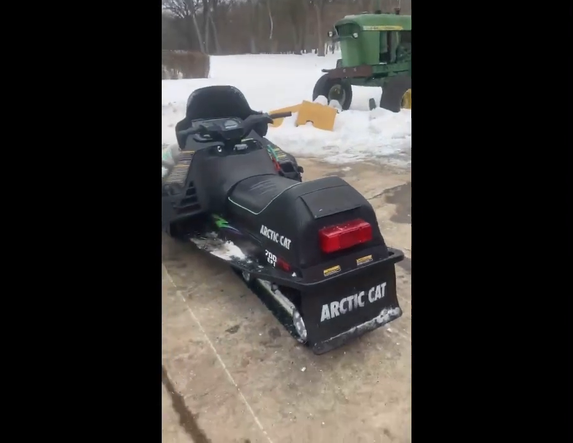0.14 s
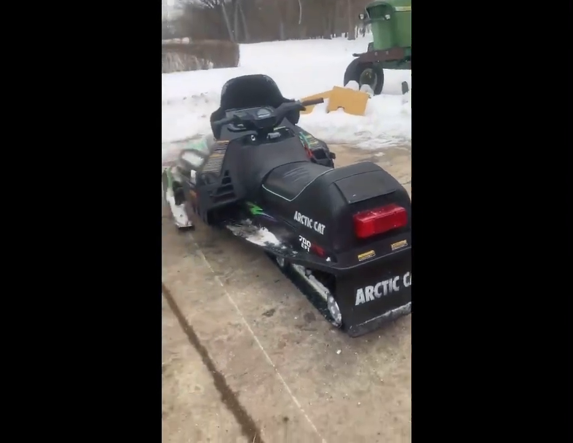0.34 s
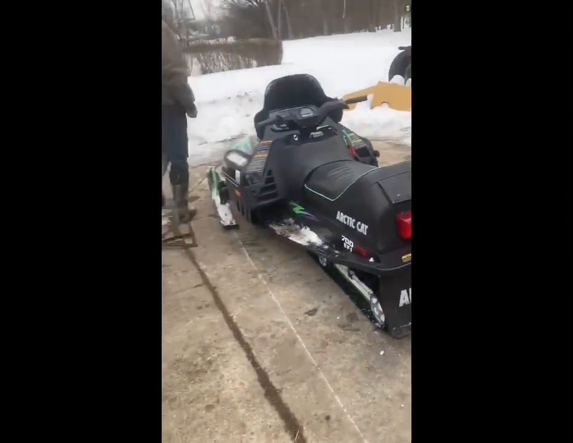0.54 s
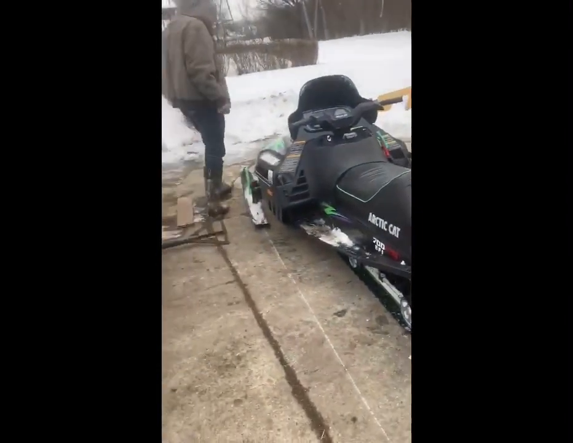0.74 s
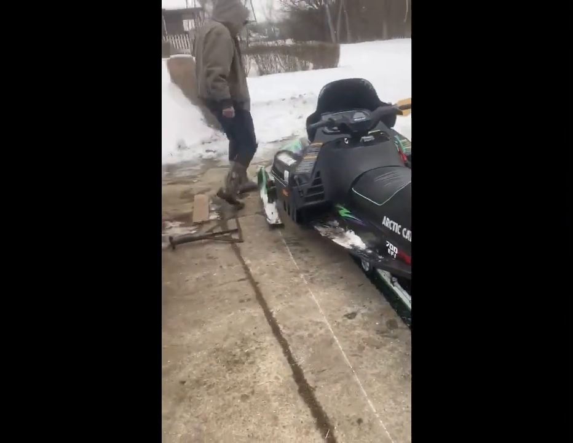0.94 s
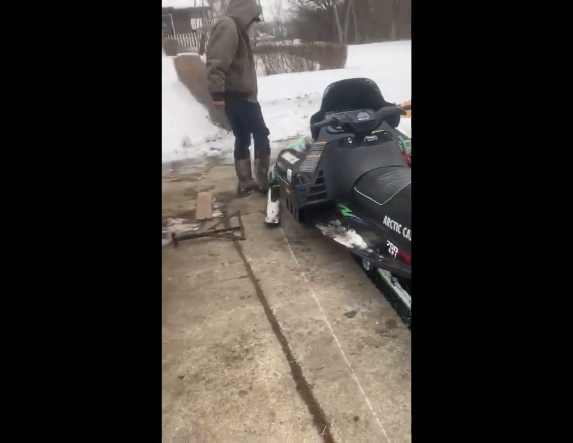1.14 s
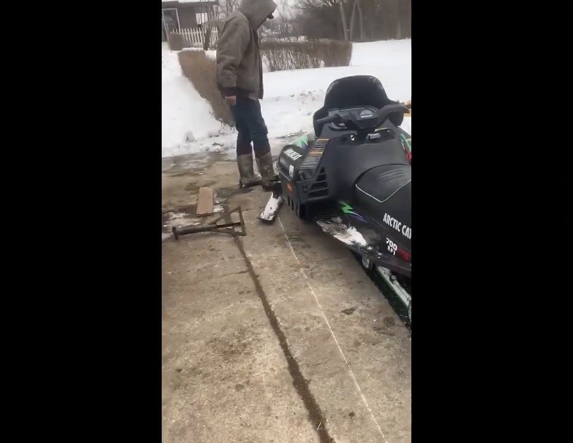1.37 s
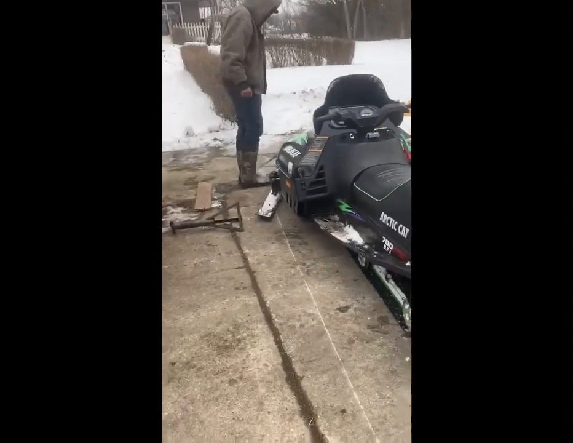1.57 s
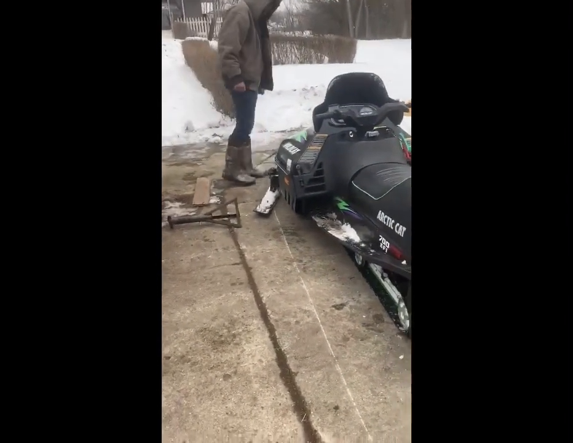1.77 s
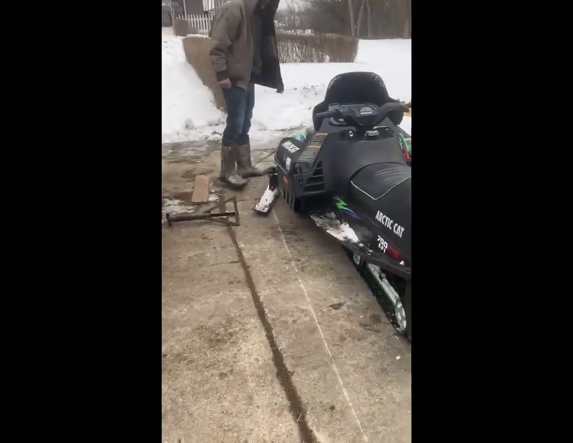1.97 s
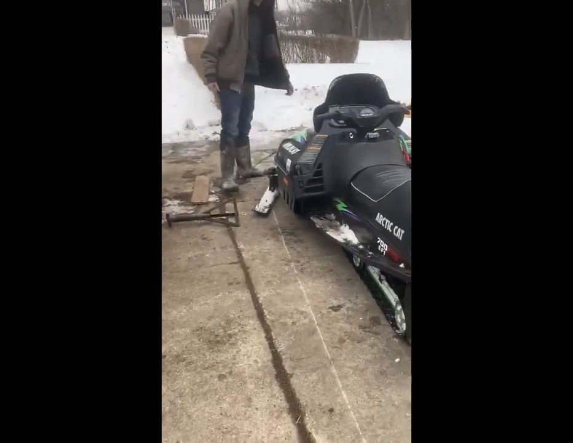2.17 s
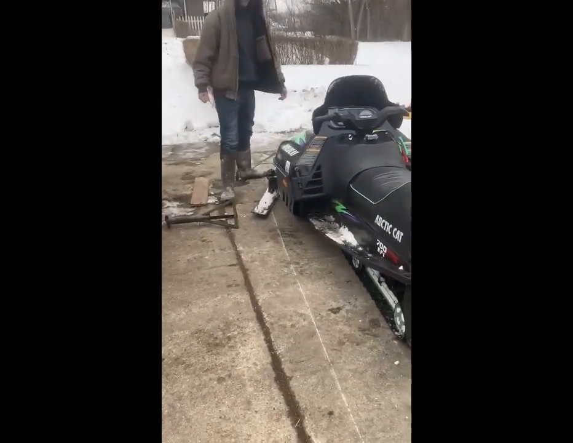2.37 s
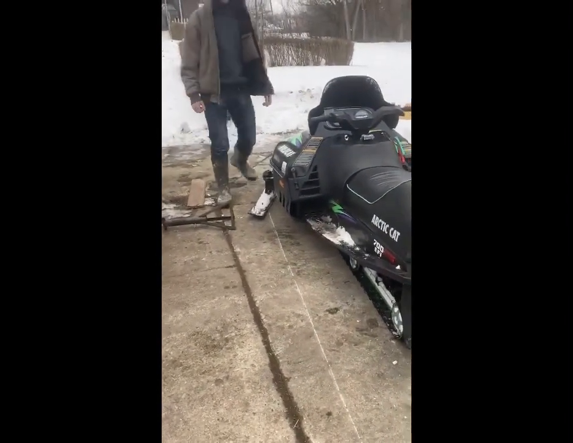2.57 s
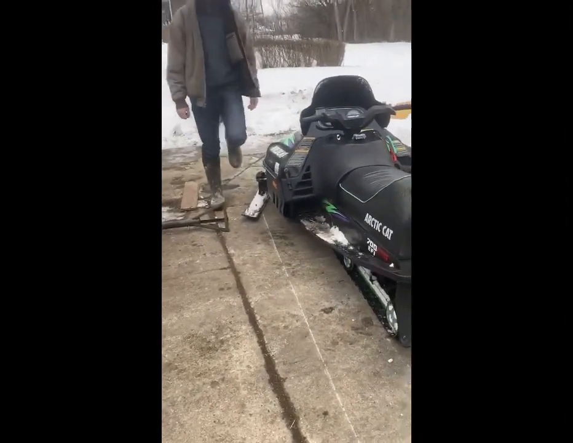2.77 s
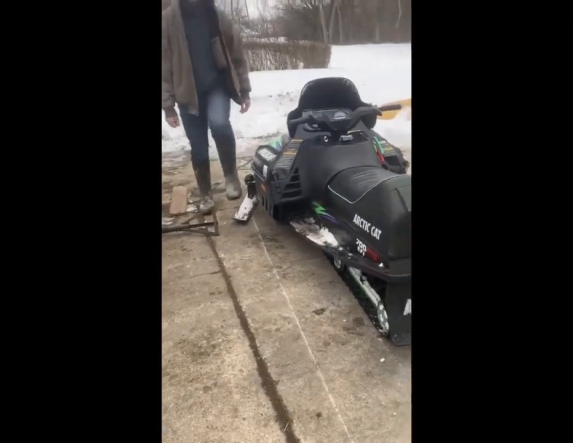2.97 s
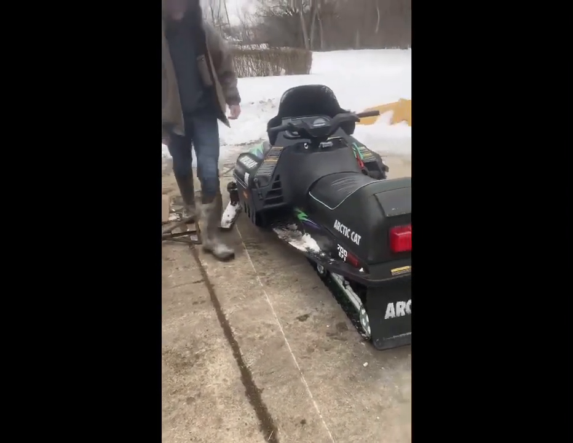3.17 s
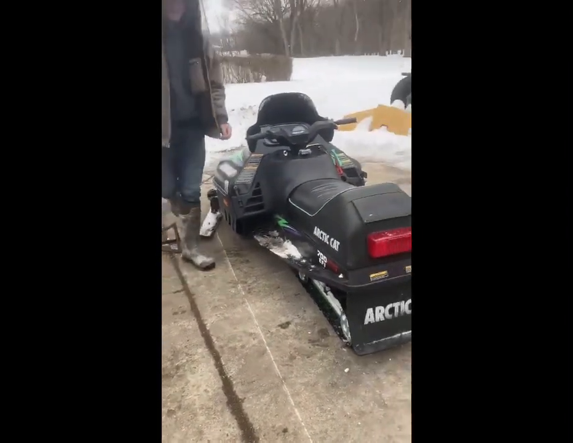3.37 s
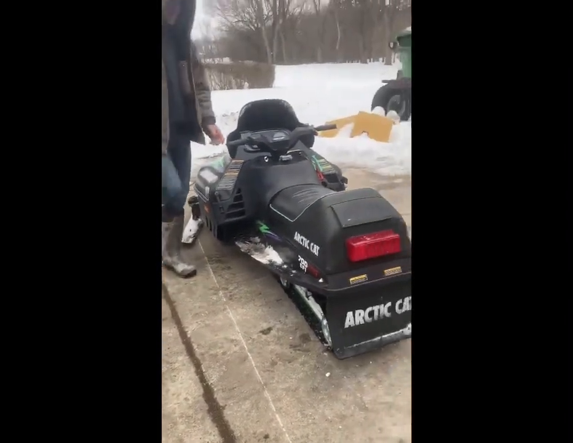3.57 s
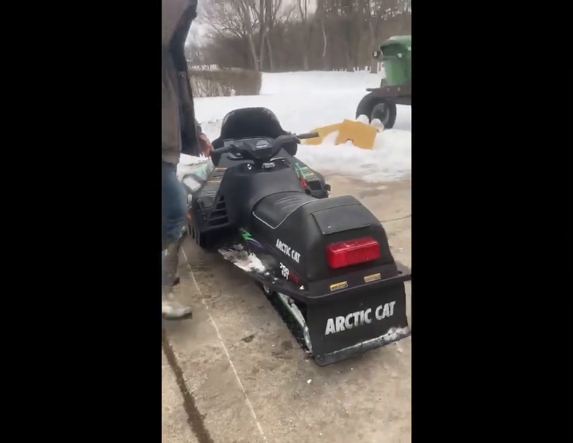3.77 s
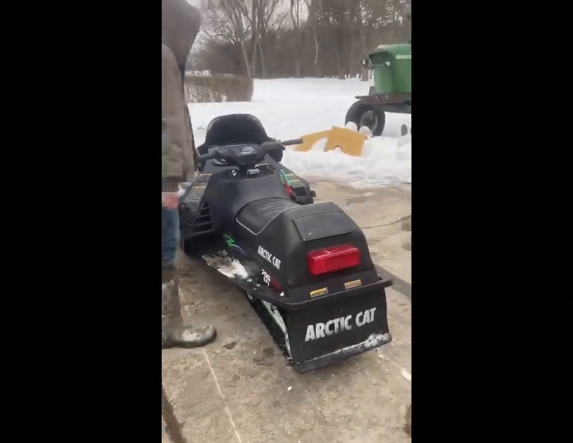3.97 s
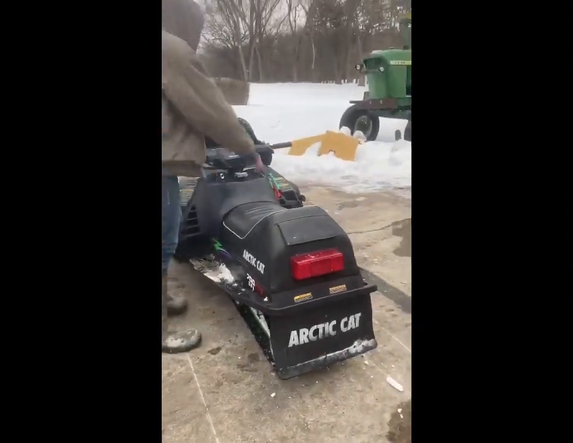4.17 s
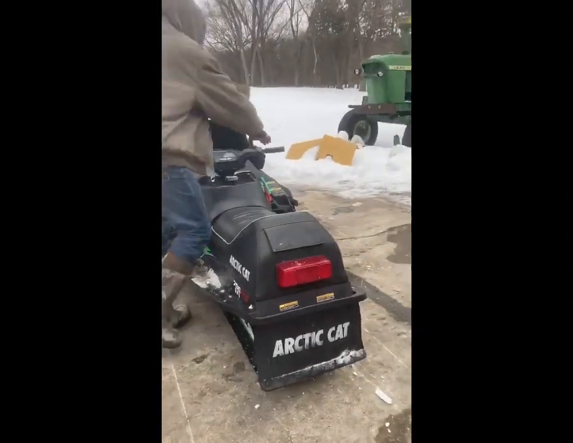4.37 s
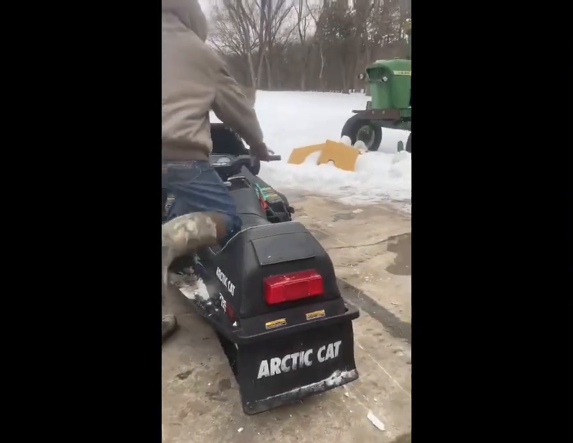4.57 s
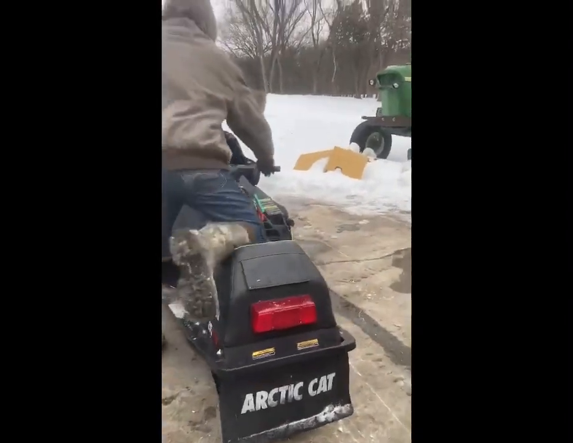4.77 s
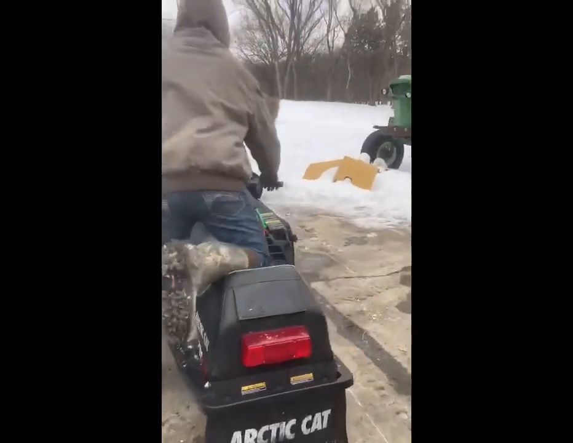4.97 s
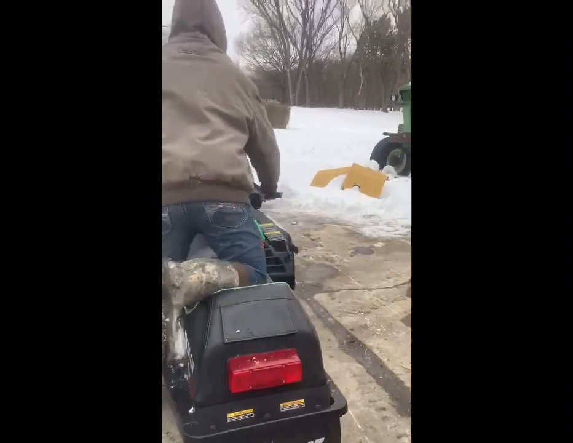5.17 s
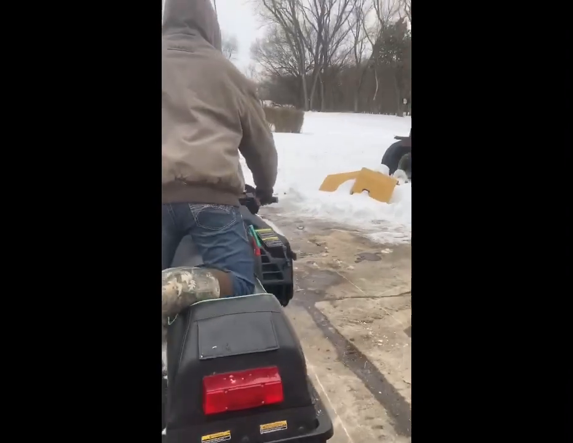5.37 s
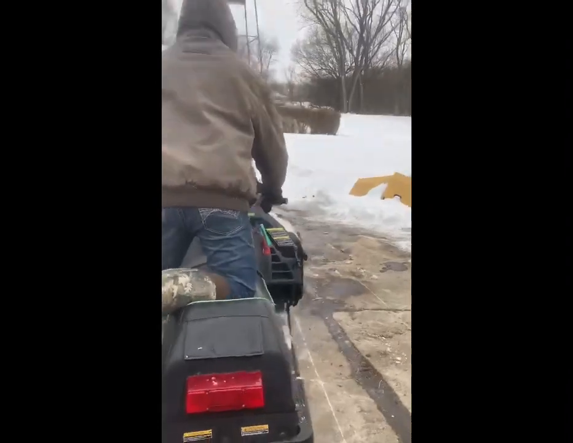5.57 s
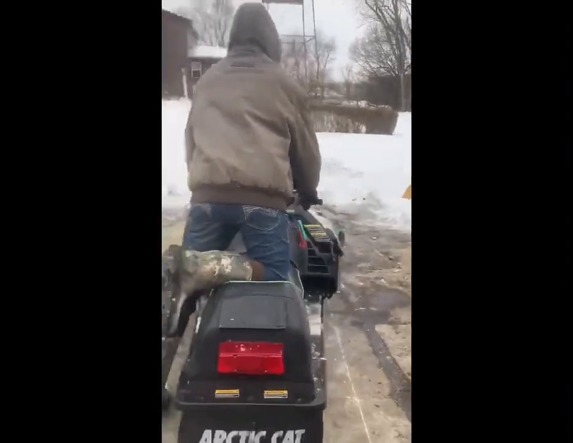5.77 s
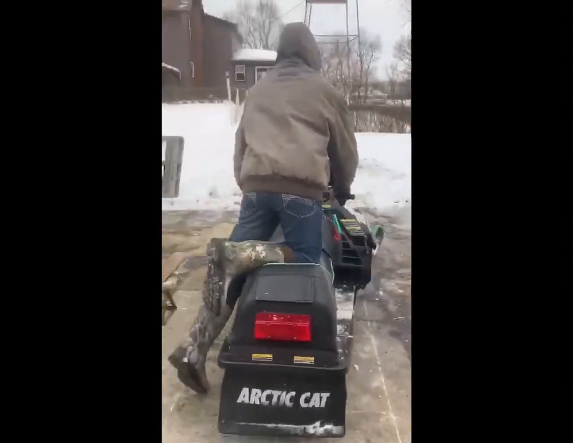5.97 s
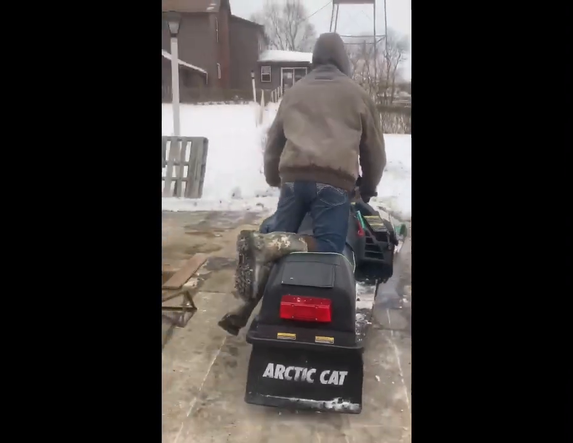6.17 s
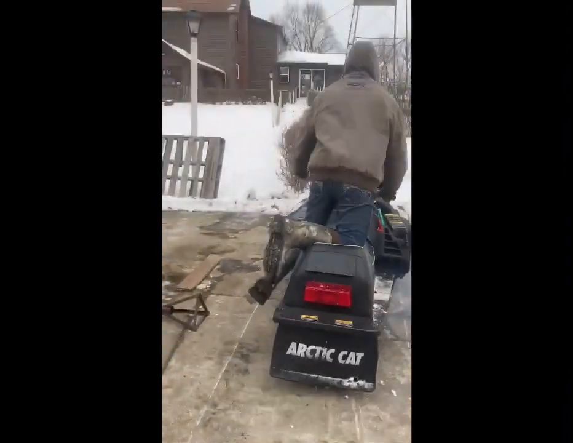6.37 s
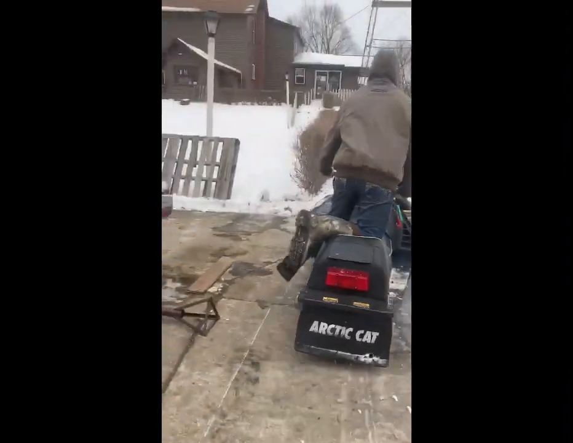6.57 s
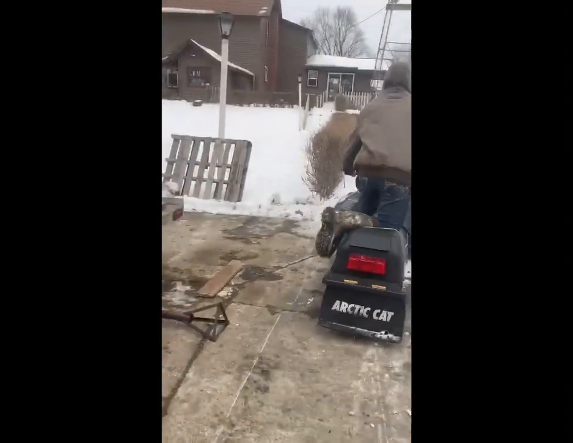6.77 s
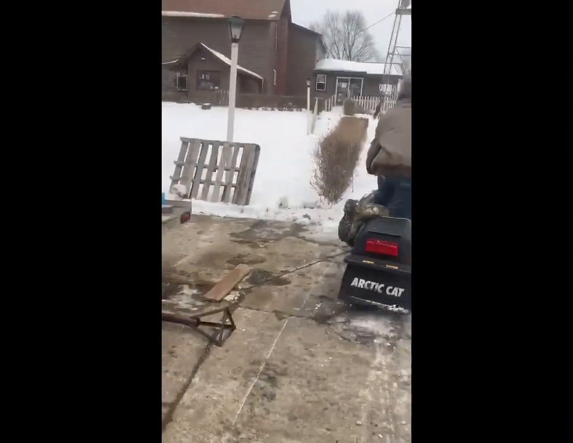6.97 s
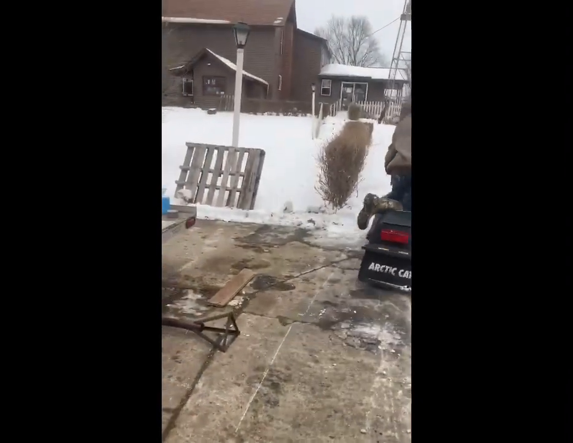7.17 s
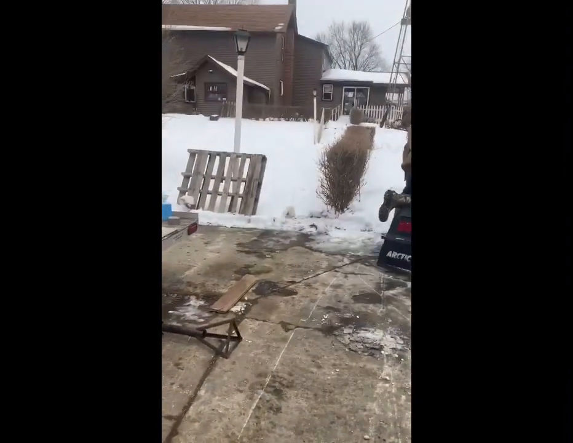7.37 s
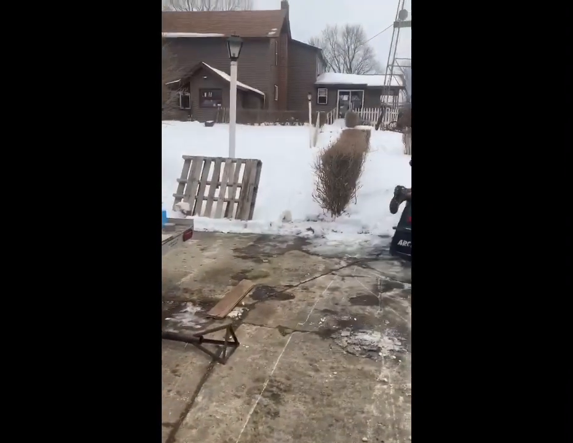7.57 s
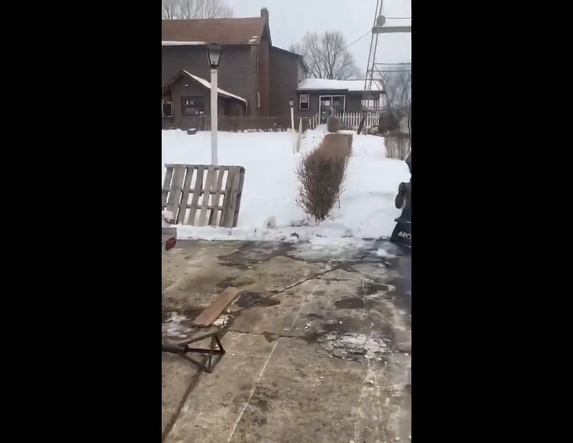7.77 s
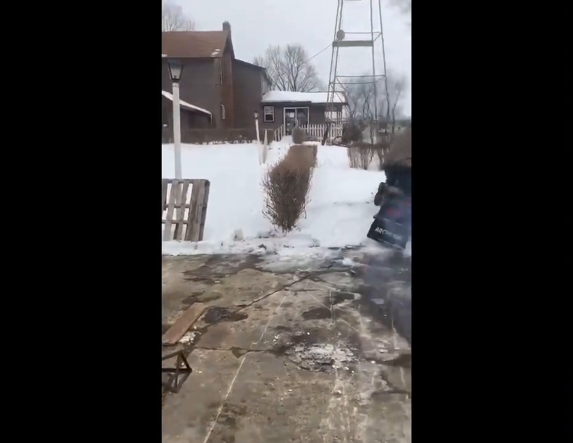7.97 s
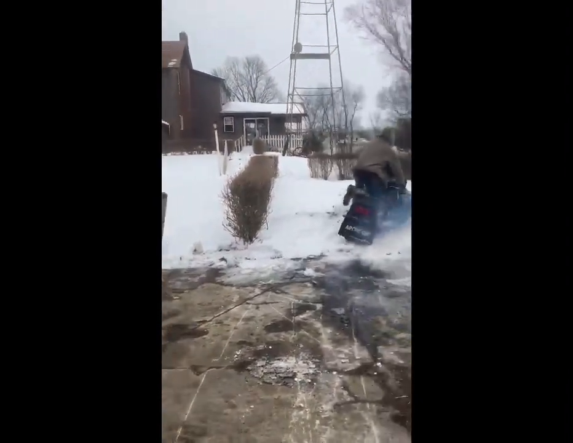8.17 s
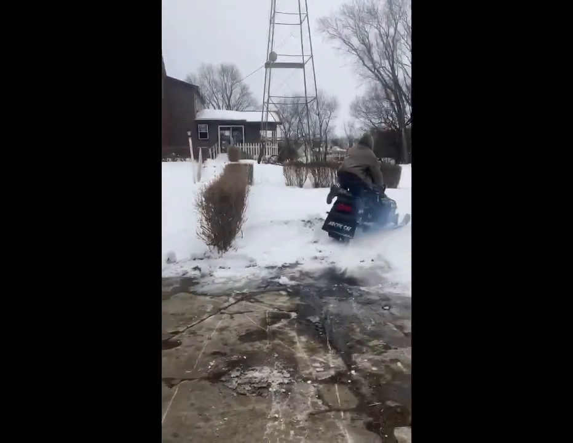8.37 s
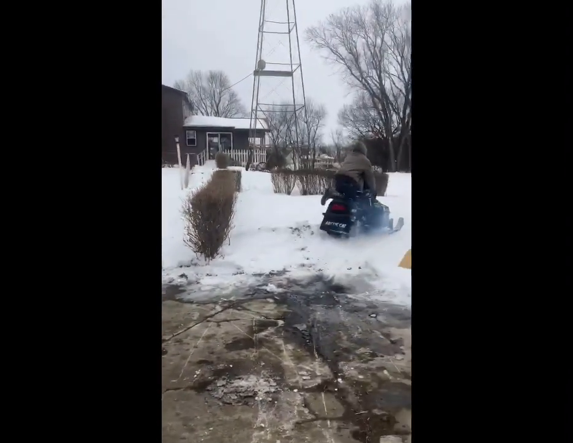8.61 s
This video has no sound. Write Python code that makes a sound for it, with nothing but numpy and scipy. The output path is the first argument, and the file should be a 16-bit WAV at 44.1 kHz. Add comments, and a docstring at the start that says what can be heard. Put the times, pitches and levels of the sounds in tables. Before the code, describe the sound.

A two-stroke snowmobile idles lumpily close by, gets revved in a hard snarling blip, then rattles away across concrete onto snow.

```python
"""A lumpy idle is heard first: a twin-cylinder two-stroke snowmobile close by on a concrete drive.
At idle every stroke pumps the pipe, but only one in several catches and bangs through muffler and hood.
It is blipped, and under throttle noise-filled firings merge into bark, rasp and snarl; a few misfire.
It rides off onto snow: filtered noise makes the track rumble and the skis scrape, and ringing knocks clack.
Behind it lie a faint return from the buildings and air moving at the two-port microphone."""
import sys
import numpy as np
from scipy import signal
from scipy.fft import rfft, irfft
from scipy.io import wavfile
from scipy.ndimage import uniform_filter1d, minimum_filter1d

SR = 44100
rng = np.random.default_rng(int(sys.argv[2]) if len(sys.argv) > 2 else 0)


def unload_wav(signal):
    """Save mono or channel-first audio to the path in sys.argv[1] as 16-bit WAV at rate SR, clipped to [-1, 1]."""
    wavfile.write(
        sys.argv[1],
        SR,
        np.round(np.clip(np.atleast_2d(signal).T, -1, 1) * 32767).astype(np.int16),
    )


N = 381024

# Engine speed ahead of a small slip at idle. Each row: time in seconds, strokes per second.
ENGINE_SPEED = [(0, 87), (0.7, 80.8), (2.15, 89), (2.7, 78.5), (3.2, 74.5), (4.85, 75.4), (4.98, 81.6),
                (5.13, 120.6), (5.26, 148), (5.39, 179), (5.62, 122.6), (5.83, 97.7), (5.91, 114),
                (6.03, 129), (6.23, 141.6), (6.33, 137.5), (6.46, 119), (6.63, 136.5), (6.8, 132),
                (7.02, 115.5), (7.4, 115.5), (7.7, 117), (8.17, 116.6), (8.36, 120.3), (8.64, 132)]
# Squeezes of the throttle. Each row: starts to open in seconds, starts to close in seconds, opening 0-1.
THROTTLE_SQUEEZES = [(4.926, 5.371, 0.87), (5.836, 6.234, 0.55), (6.389, 6.59, 0.46), (6.561, 7.255, 0.29),
                     (8.203, 8.644, 0.35)]
OPEN_S, CLOSE_S = 0.1, 0.14  # travel time of the throttle
IDLE_ENDS_S, IDLE_FADE_S = 4.87, 0.14
RUNNING_HZ = 120  # stroke rate at which the running levels hold

# The sled gathers way from near the microphone and rides straight off.
SETS_OFF_S, PICKUP_S, CRUISE_M_S, NEAR_M = 5.94, 2.15, 2.5, 1.7
# When the track leaves the concrete, how long that takes, share of the dB added at cruise that is lost.
ON_SNOW_S, ONTO_SNOW_S, SNOW_HUSH = 7.52, 0.58, 0.17
SNOW_MUFFLE_DB, SNOW_DULL_DB = 3.5, 1  # soft snow under the sled soaks up the bark and the rasp

# Charges that catch with a bang. Each row: time in seconds, relative strength in dB.
BANG_EVENTS = [(0.048, -16.5), (0.122, -17), (0.191, -20), (0.239, -17.5), (0.31, -17.5), (0.36, -17.5),
               (0.431, -16), (0.528, -17.5), (0.6, -15), (0.661, -20.5), (0.696, -15), (0.744, -24),
               (0.794, -18), (0.865, -14.5), (0.987, -16.5), (1.037, -16.5), (1.109, -20), (1.158, -16),
               (1.207, -16.5), (1.305, -15.5), (1.344, -32.5), (1.381, -16.5), (1.431, -16), (1.504, -22),
               (1.551, -15.5), (1.648, -17.5), (1.698, -13), (1.795, -13), (1.856, -13), (1.892, -15.5),
               (1.966, -21), (2.014, -15), (2.075, -15.5), (2.136, -13.5), (2.232, -14), (2.307, -14.5),
               (2.381, -14), (2.456, -15), (2.53, -14), (2.57, -20.5), (2.605, -14), (2.694, -15),
               (2.731, -16.5), (2.807, -15), (2.854, -26), (2.884, -14.5), (2.988, -14), (3.027, -15),
               (3.09, -17.5), (3.142, -18.5), (3.199, -19), (3.248, -14), (3.3, -23.5), (3.353, -14),
               (3.394, -18), (3.433, -14), (3.526, -13.5), (3.587, -24), (3.617, -13.5), (3.657, -18.5),
               (3.695, -15), (3.775, -11), (3.853, -13.5), (3.901, -25), (3.931, -17.5), (3.972, -15.5),
               (4.038, -14.5), (4.119, -10.5), (4.198, -13.5), (4.278, -13), (4.318, -20.5), (4.358, -12.5),
               (4.438, -13.5), (4.478, -15), (4.518, -14), (4.598, -13), (4.639, -13.5), (4.677, -14),
               (4.757, -13), (4.822, -14), (4.862, -13.5), (4.938, -11), (4.991, -11), (5.045, -9.5),
               (5.462, -17), (5.573, -22), (5.66, -18.5), (5.77, -24), (5.829, -12), (5.899, -13),
               (5.997, -6.5), (6.318, -13.5), (6.39, -13.5), (6.456, -19)]
SWELL_LEAD_S = 0.002001  # each bang's pulse starts this long before its listed time, since its sound swells up
SECOND_DB, THIRD_DB = -7.5, -9.5  # most that the two strokes after a bang burn, relative to it
BANG_VARY_DB = 2.1  # how far, up or down, a bang's share of each group of modes may stray

# Pipe, muffler and hood modes. Each row: frequency in Hz, t60 in seconds, relative level in dB,
# lead of the left side in radians.
EXHAUST_MODES = [(103, 0.091, -6.5, .05), (159, 0.045, -3.5, .1), (210, 0.046, -7.5, .13),
                 (304.8, 0.066, -10, 0.23), (418.6, 0.046, -5.5, .25), (463, 0.049, -10.5, 0.79),
                 (497.7, 0.051, -8.5, 1.1), (583, 0.048, -16, 0.96), (719, 0.055, -15.5, 0.46),
                 (819, 0.054, -5, 0.2), (1031, 0.057, -13.5, 1.4), (1382, 0.048, -16.5, .5),
                 (1540, 0.035, -5, .2), (1666, 0.04, -12.5, .67)]
# A ski's ring. Each row: frequency in Hz, t60 in seconds, relative level in dB, left lead in radians.
SKI_RING = [(2080, .03, -6, .5), (4250, .018, -10, .8), (6300, .016, -11, .3)]
# A metallic ring. Each row: frequency in Hz, t60 in seconds, relative level in dB, left lead in radians.
METAL_RING = [(1576, 0.16, -1, .2), (1650, 0.033, -5, .6)]
WHINE_S, WHINE_RISE_S, WHINE_ENDS_S, WHINE_FALL_S, WHINE_DB = 5.34, .06, 5.49, .045, -26.5

# Pipe orders without load; half orders come from the unequal cylinders. Each row: multiple of the stroke
# rate, dB in full at idle fading to none, dB weighted by a half at idle and one and a half running.
PIPE_ORDERS = [(1, -1, -2.5), (2, 1.5, -1), (2.5, -2.5, -16), (3, -6, -2.5), (3.5, -21, -7.5), (4, -7, -8),
               (5, -19, -5), (5.5, -11.5, -16), (6, -6, -13)]
# Unloaded hum of an order by its pitch. Each row: frequency in Hz, level in dB.
PIPE_HUM = [(74, -28), (83, -24), (120, -26), (150, -27), (166, -29.5), (189, -20.5), (208, -30),
            (228, -26), (247, -30.5), (302, -28.5), (345, -33), (420, -21.5), (460, -27.5), (495, -29.5),
            (560, -30.5), (660, -43.5), (800, -42.5)]
# Boom of an order at full throttle by its pitch. Each row: frequency in Hz, level in dB.
PIPE_BOOM = [(80, -11), (100, -7), (116, -14), (127, -3), (138, -16.5), (150, -35), (172, -20),
             (215, -30.5), (268, -17.5), (300, -15.5), (345, -27.5), (420, -35), (660, -33), (800, -22),
             (950, -41)]
BOOM_POWER = 1.69  # exponent of throttle opening
PORT_LAG_S = 0.00022  # delay of the pipe wave between the two microphone ports
PIPE_SPREAD = 0.035  # turns by which the pipe holds back each order, times the order squared
PIPE_FLUTTER_DB, WOBBLE_TURNS = 1.3, .018  # random spread from stroke to stroke, off idle

# Charges that fail while running, each a short hole in the firings. Each entry: time in seconds.
MISFIRE_TIMES = [5.548, 5.625, 5.745, 5.797, 5.866, 6.295, 6.375, 6.437, 7.015, 7.083, 7.135, 7.203, 7.432,
                 7.52, 7.588, 7.68]
MISFIRE_S, MISFIRE_DB = .013, -13  # half width of the hole, and its depth
SPUTTER_DB = 2.2  # scale of the slow waver of strokes off the throttle
UNEVEN_DB = 2.2  # one cylinder over the mean, the other as far under
EVEN_FROM = 0.66  # throttle opening from which the engine no longer sputters
STEADIED = 0.16  # share of the sputter that the load of the moving track smooths away
GAS_DB, GAS_SHUT_DB = -3, 7  # gas noise when firing evenly, and its rise with full sputter
SNARL_DB, SNARL_DB_PER_OCTAVE = -20, 3.5

# Level laws of the layers near the microphone. Each row: dB idling, dB running with the throttle shut,
# dB added by full throttle, dB per doubling of speed, dB added at cruise on concrete.
BARK_LEVEL = (-35.5, -28.5, 10.5, -6.5, 3)
RASP_LEVEL = (-39.5, -31, 14.5, -2.5, 5.5)
SCRAPE_LEVEL = (-61.5, -46.5, 7.5, 3.5, 5.5)
RUMBLE_LEVEL = (-29.5, -25.5, 4.5, -3, 4)

# Colour of a bang's crack. Each row: frequency in Hz, relative gain in dB.
BANG_COLOUR = [(60, -17), (130, 2.5), (250, -0.5), (500, 0), (660, -16), (900, -15.5), (1200, -8),
               (1750, -8), (2200, -20.5), (3200, -36.5), (4600, -30), (5400, -46.5), (6600, -50.5),
               (7600, -59.5)]
# Colour of the muffler's bark. Each row: frequency in Hz, relative gain in dB.
BARK_COLOUR = [(45, -42.5), (100, -24), (165, -13), (240, 2), (300, 2), (430, 5), (560, 5), (690, -1.5),
               (810, -1), (1050, -13), (1800, -68.5)]
# Colour of the rasp through the hood. Each row: frequency in Hz, relative gain in dB.
RASP_COLOUR = [(500, -21), (850, 4.5), (1080, 7), (1300, 4.5), (1550, 4.5), (1900, 1), (2300, -8.5),
               (3200, -21.5), (4600, -34), (5500, -35.5), (7000, -41.5), (8000, -52)]
# Colour of the wide-open snarl. Each row: frequency in Hz, relative gain in dB.
SNARL_COLOUR = [(450, -29), (650, 6.5), (790, 7), (1000, -0.5), (1300, -7.5), (1650, 2), (1920, 7),
                (2400, -10), (3200, -22.5), (4500, -25), (7000, -64.5)]
# Colour of skis and cleats on grit. Each row: frequency in Hz, relative gain in dB.
SCRAPE_COLOUR = [(1200, -33), (2400, 18.5), (3400, 6), (4500, 16.5), (5000, 12.5), (5500, 4.5),
                 (6800, -1.5), (7600, -27.5), (10500, -26), (13000, -30)]
# Colour of chassis and track. Each row: frequency in Hz, relative gain in dB.
RUMBLE_COLOUR = [(20, -18.5), (33, -13.5), (52, -7.5), (72, 6.5), (100, 6.5), (185, 3.5), (400, -11.5),
                 (900, -60.5)]
# Colour of a ski's tick and rattle. Each row: frequency in Hz, relative gain in dB.
CLACK_COLOUR = [(600, -12), (1400, 3.5), (2100, 11), (2900, -2.5), (3900, -2), (5200, -12), (6500, -16),
                (8200, -44.5)]
GRIT_TOP_DB = 15  # strongest grain over the weakest

# Skis knocking on the ground. Each row: time in seconds, relative strength in dB.
SKI_KNOCKS = [(5.6922, -25.5), (5.698, -22.5), (6.0342, -23.5), (7.07, -29), (7.335, -31), (8.334, -16.5)]

# Unrelated part of stereo noise, side over mid. Each row: frequency in Hz, gain in dB.
STEREO_WIDTH = [(25, -0.5), (70, -12), (190, -31.5), (320, -15), (500, -9.5), (800, -4), (1600, -5.5),
                (2600, 0.5), (5000, 0.5)]
# Tilt of the stereo picture, left over right. Each row: frequency in Hz, difference in dB.
STEREO_LEAN = [(60, 2), (210, -0.6), (500, 0), (750, 0), (1130, 6.5), (1700, 4), (2600, 1.5), (4500, 0)]
PORT_TURN = 0.16  # how far the treble is turned in phase between the two microphone ports
SHIFT_HZ = 0.4561  # how fast the pattern of reflections changes as sled and microphone move
BREEZE_DB = -43.5  # air moving past the microphone
TOP_HZ, LIMIT, LIMIT_S = 14000, .93, .005  # upper cutoff; limiter's ceiling and reaction time


def pipe(turns, hz, throttle, idle):
    """Every stroke pumps a pressure wave; under load its orders boom as they cross the pipe's resonances."""
    at, wave = stroke_starts(turns), 0
    # lean strokes burn early or late
    wobble = WOBBLE_TURNS * (1 - idle) * (1 - throttle) * stroke_noise(at)
    heard = turns + wobble - .3 + PORT_LAG_S * hz * np.array([[.5], [-.5]])
    for order, idling_db, running_db in PIPE_ORDERS:
        order = round(2 * order) / 2
        hum = tone_gain(order * hz, PIPE_HUM) * undb(idle * idling_db + (1.5 - idle) * running_db)
        boom = tone_gain(order * hz, PIPE_BOOM) * throttle ** BOOM_POWER
        flutter = undb(PIPE_FLUTTER_DB * np.sqrt(order) * (1 - idle) * stroke_noise(at))
        cycle = np.cos(2 * np.pi * (order * heard - PIPE_SPREAD * order ** 2))
        wave = wave + (hum + boom) * flutter * cycle
    return np.sqrt(2) * wave


def bangs(hz, idle):
    """A charge catches: a crack and a ring coloured by turbulent gas, with weaker ones on the next strokes."""
    times, db = np.transpose(BANG_EVENTS)
    chance = rng.random((len(times), 2))
    stroke_s = 1 / hz[(times * SR).astype(int)]
    times = times - SWELL_LEAD_S
    first = taps(times, undb(db))
    second = taps(times + stroke_s, undb(db + SECOND_DB - 2.9 * chance[:, 0]))
    third = taps(times + 2 * stroke_s, undb(db + THIRD_DB - 95 * chance[:, 1]))  # mostly fails
    pulses = first + second + third
    reflections = unit(panels(pulses, t60=0.065, rise_s=0.0096))
    crack = reflections + undb(1.5) * unit(puffs(pulses, t60=0.13))
    push = unit(pulses) + .65 * unit(puffs(pulses, t60=.025, rise_s=.0005).mean(0))
    # every bang shares its energy differently between pipe, muffler and hood
    which = np.searchsorted(times[1:] * SR, np.arange(N) + 1)
    shares = undb(BANG_VARY_DB * rng.uniform(-1, 1, (len(times), 3)))
    groups = (EXHAUST_MODES[:4], EXHAUST_MODES[4:10], EXHAUST_MODES[10:])
    rung = sum(modes(push * share[which], rows) for share, rows in zip(shares.T, groups))
    body = colour(rung, [(60, 2.5), (100, 3.0), (1900, -3.5), (3000, -25.5), (7000, -36.5)])
    mix = undb(-24.5) * unit(colour(crack, BANG_COLOUR)) + undb(-20.5) * unit(body)
    return mix * undb(-3.5 * (2.5 - idle))  # weaker once running


def firings(turns, hz, throttle, idle, moving, bark_db, rasp_db):
    """Running strokes bark from the muffler and rasp through the hood; throttle evens them and adds snarl."""
    wild = np.clip(1 - throttle / EVEN_FROM, 0, 1) * (1 - STEADIED * moving)
    pulses = strokes(turns, wild * (1 - idle / 2))
    gas = undb(GAS_DB + GAS_SHUT_DB * wild)

    chamber = panels(pulses, t60=.008, shift_hz=0)
    muffler = unit(chamber) + gas * unit(puffs(pulses, t60=0.034))
    muffler_ring = undb(-21.0 + 6.2 * idle) * unit(modes(pulses, EXHAUST_MODES[4:10]))
    bark = unit(unit(colour(muffler, BARK_COLOUR)) + muffler_ring)

    hood = unit(panels(pulses, t60=.022)) + gas * undb(3) * unit(puffs(pulses, t60=.03))
    # one hood mode sings through the rasp, most from behind as the sled leaves
    sheet = undb(-31.0 + 14 * moving) * unit(modes(hood.mean(0), EXHAUST_MODES[12:13]))
    rasp = unit(unit(colour(hood, RASP_COLOUR)) + sheet)

    blast = unit(panels(pulses, t60=.022)) + .7 * unit(puffs(pulses, t60=.012, rise_s=.0005))
    snarl = unit(colour(blast, SNARL_COLOUR)) * throttle ** 2 * (1 - .6 * moving)
    snarl_db = SNARL_DB + SNARL_DB_PER_OCTAVE * np.log2(hz / RUNNING_HZ)
    return bark * undb(bark_db) + rasp * undb(rasp_db) + snarl * undb(snarl_db)


def strokes(turns, wild):
    """One pulse per stroke, evened in mean power before sputter: unequal cylinders and scattered charges."""
    at = stroke_starts(turns)
    chance = rng.standard_normal((N // 100, 3))[:len(at)]
    cylinder_db = UNEVEN_DB * (-1) ** np.arange(len(at))
    size = undb((1.6 + 1.5 * wild[at]) * chance[:, 0] + cylinder_db)
    late_s = (.000025 + .00011 * wild[at]) * chance[:, 1]
    power = uniform_filter1d(size ** 2, size=11) / np.gradient(at)
    # off the throttle the strokes waver a little, and now and then a few in a row misfire
    missed = np.abs(at[:, None] / SR - np.array(MISFIRE_TIMES)).min(1) < MISFIRE_S
    waver = SPUTTER_DB * wild[at] * uniform_filter1d(chance[:, 2], size=3)
    return taps(at / SR + late_s, undb(waver + MISFIRE_DB * missed) * size / np.sqrt(power))


def crank(hz):
    """Strokes counted from the start; at idle the crank gains or loses a little so bangs fall on strokes."""
    turns, times = np.cumsum(hz) / SR, np.transpose(BANG_EVENTS)[0]
    at = (times[times < IDLE_ENDS_S] * SR).astype(int)
    slip = np.unwrap(2 * np.pi * (turns[at] % 1)) / (2 * np.pi)
    return turns - np.interp(np.arange(N), at, uniform_filter1d(slip, size=3, mode="nearest"))


def lever():
    """Throttle opening: each squeeze opens, holds and lets go; the widest one counts."""
    return np.max([opening * ramp(opens, OPEN_S) * (1 - ramp(closes, CLOSE_S))
                   for opens, closes, opening in THROTTLE_SQUEEZES], axis=0)


def stroke_starts(turns):
    """The sample at which each stroke begins."""
    return np.flatnonzero(np.diff(np.floor(turns)) > 0)


def stroke_noise(at):
    """A random value for each stroke, gliding from one to the next."""
    return np.interp(np.arange(N), at, rng.standard_normal(N // 100)[:len(at)])


def running_gear(scrape_db, rumble_db):
    """The chassis and rubber track rumble; skis and cleats grind grit against the ground."""
    grains = rng.random((6000, 2))
    grain_db = np.minimum(-3.5 * np.log(grains[:, 1]), GRIT_TOP_DB)
    grit = taps(grains[:, 0] * N / SR, undb(grain_db))
    grinding = unit(puffs(grit, t60=0.02)) + undb(-20.5) * unit(air(N))
    scrape = unit(colour(grinding, SCRAPE_COLOUR))
    rumble = unit(colour(air(N), RUMBLE_COLOUR))
    return scrape * undb(scrape_db) + rumble * undb(rumble_db)


def clacks():
    """A ski drops on an edge: a sharp tick, a brief ring and a short rattle."""
    times, db = np.transpose(SKI_KNOCKS)
    knocks = taps(times, undb(db))
    tick = puffs(knocks, t60=.03, rise_s=.0001)
    rattle = undb(-25.0) * puffs(knocks, t60=0.42)
    return undb(7.0) * colour(tick + rattle, CLACK_COLOUR) + modes(knocks, SKI_RING)


def whine():
    """Noise rings narrow metallic modes, swelling at the top of the first blip and outlasting it."""
    swell = ramp(WHINE_S, WHINE_RISE_S) * (1 - ramp(WHINE_ENDS_S, WHINE_FALL_S))
    return undb(WHINE_DB) * swell * unit(modes(rng.standard_normal(N), METAL_RING))


def yard(sled):
    """The buildings return a faint, diffuse tail of noise-like reflections."""
    tail = ring(sled.mean(0), fade(0.97) * air(SR // 4))
    return undb(-29.5) * unit(colour(tail, [(100, -16.0), (500, -7.0), (3000, -5.0), (8000, -10.5)]))


def breeze():
    """A faint rumble of air at the microphone: noise kept to the bass."""
    bass = [(20, -15.5), (50, 0.0), (75, 3.5), (140, -20.5), (400, -64)]
    return undb(BREEZE_DB) * unit(colour(air(N), bass))


def puffs(pulses, t60, rise_s=0.013):
    """A burst of turbulent gas or grit after each pulse: noise shaped by a decaying envelope."""
    return ring(pulses, fade(t60, rise_s)) * air(N)


def panels(pulses, t60, rise_s=0.00025, shift_hz=SHIFT_HZ):
    """Dense reflections inside the hood; their pattern shifts slowly as the sled and the listener move."""
    angle = 2 * np.pi * shift_hz * np.arange(N) / SR
    one, other = (ring(pulses, (fade(t60, rise_s) * air(SR // 4))[:, :SR // 10]) for _ in range(2))
    return np.cos(angle) * one + np.sin(angle) * other


def modes(pulses, rows):
    """Pulses ring damped modes; neighbours start in opposite directions and low modes build up slowly."""
    t, sides = np.arange(SR // 4) / SR, np.array([[.5], [-.5]])
    response = 0
    for k, (hz, t60, db, lead) in enumerate(rows):
        swing = np.sin(2 * np.pi * hz * (t - .0006) + lead * sides)
        response = response + (-1) ** k * undb(db) * fade(t60, 0.003 + 0.53 / hz) * swing
    return ring(pulses, response)


def air(size):
    """Stereo noise: alike on both sides in the bass; in the treble partly unrelated, and the left leads."""
    mid, side = rng.standard_normal((2, size))
    lead = np.roll(mid, -3) - np.roll(mid, 3)
    return mid + (colour(side, STEREO_WIDTH)[0] + PORT_TURN * lead) * np.array([[1], [-1]])


def fade(t60, rise_s=0.01):
    """A quarter second of exponential decay after a short swell."""
    t = np.arange(SR // 4) / SR
    return np.exp(-np.log(1000) * t / t60) * -np.expm1(-t / rise_s)


def taps(times, sizes):
    """One impulse per event."""
    return np.bincount(np.clip(np.asarray(times) * SR, 0, N - 1).astype(int), sizes, N)


def ring(x, response):
    """Pass a sound through an impulse response."""
    x = np.atleast_2d(x)
    return signal.oaconvolve(x, np.atleast_2d(response), axes=1)[:, :x.shape[1]]


def colour(x, points, size=4096):
    """Causal filter with the given spectrum, from the cepstrum of its log gain."""
    hz, db = np.transpose(points)
    f = np.maximum(np.fft.rfftfreq(size, 1 / SR), 1)
    cepstrum = irfft(np.log(undb(np.interp(np.log(f), np.log(hz), db))))
    # folding the cepstrum forward in time gives minimum phase
    cepstrum[1:size // 2] *= 2
    cepstrum[size // 2 + 1:] = 0
    return ring(x, irfft(np.exp(rfft(cepstrum))))


def tone_gain(hz, tone):
    """Gain read from a table of frequency and dB."""
    return undb(np.interp(hz, *np.transpose(tone)))


def ramp(start_s, length_s):
    """Rises from 0 to 1 over the given time."""
    return np.clip((np.arange(N) / SR - start_s) / length_s, 0, 1)


def undb(db):
    """Decibels to gain."""
    return 10 ** (np.asarray(db) / 20)


def unit(x):
    """Scale to rms 1."""
    return x / np.sqrt(np.mean(x ** 2))


def layer_db(law, hz, throttle, idle, clatter):
    """Level of a layer from idling or running, throttle, engine speed and travel."""
    idling, shut, opened, doubled, cruising = law
    running = shut + opened * throttle + doubled * np.log2(hz / RUNNING_HZ) + cruising * clatter
    return idle * idling + (1 - idle) * running


def scene():
    """Throttle, engine speed and travel set the levels; the sled recedes and fades with distance."""
    hz = np.interp(np.arange(N) / SR, *np.transpose(ENGINE_SPEED))
    turns, throttle = crank(hz), lever()
    idle, moving = 1 - ramp(IDLE_ENDS_S, IDLE_FADE_S), ramp(SETS_OFF_S, PICKUP_S)
    snow = ramp(ON_SNOW_S, ONTO_SNOW_S)
    clatter = np.sqrt(moving) * (1 - SNOW_HUSH * snow)
    distance_m = NEAR_M + CRUISE_M_S * np.cumsum(moving) / SR

    bark_db, rasp_db, scrape_db, rumble_db = (
        layer_db(law, hz, throttle, idle, clatter)
        for law in (BARK_LEVEL, RASP_LEVEL, SCRAPE_LEVEL, RUMBLE_LEVEL))
    bark_db = bark_db - SNOW_MUFFLE_DB * snow
    rasp_db = rasp_db - SNOW_DULL_DB * snow

    engine = pipe(turns, hz, throttle, idle) + bangs(hz, idle)
    engine = engine + firings(turns, hz, throttle, idle, moving, bark_db, rasp_db)
    sled = engine + running_gear(scrape_db, rumble_db) + clacks() + whine()
    sled = sled * NEAR_M / distance_m
    left, right = sled + yard(sled) + breeze()
    # each side takes half of the tilt
    left = colour(left, [(f, db / 2) for f, db in STEREO_LEAN])
    right = colour(right, [(f, -db / 2) for f, db in STEREO_LEAN])
    return np.vstack([left, right])


def record(dry):
    """The microphone drops the deepest bass and dulls the top; a limiter holds down the highest peaks."""
    response = [(8, -7.5), (25, 3.5), (7000, -0.5), (7800, -4.0), (11200, -5.0), (12000, -13.0)]
    dulled = colour(dry, response)
    span = int(LIMIT_S * SR)
    needed = LIMIT / np.maximum(np.abs(dulled).max(0), LIMIT)
    gain = uniform_filter1d(minimum_filter1d(needed, span), span)
    return signal.sosfilt(signal.ellip(8, .2, 70, TOP_HZ, fs=SR, output="sos"), dulled * gain)


dry = scene()
out = record(dry)
unload_wav(out)
```